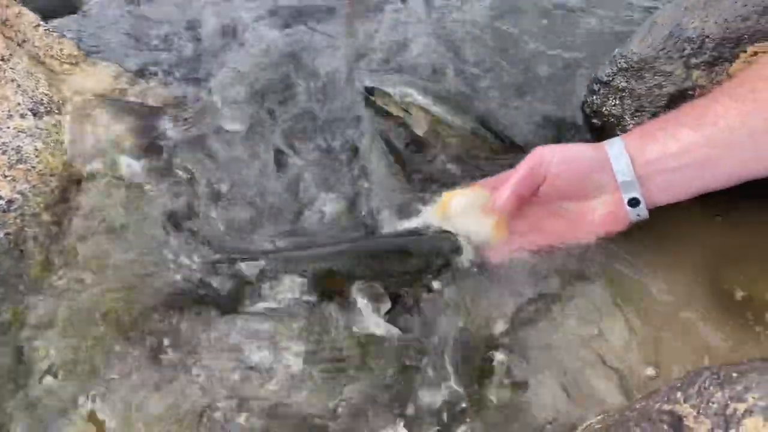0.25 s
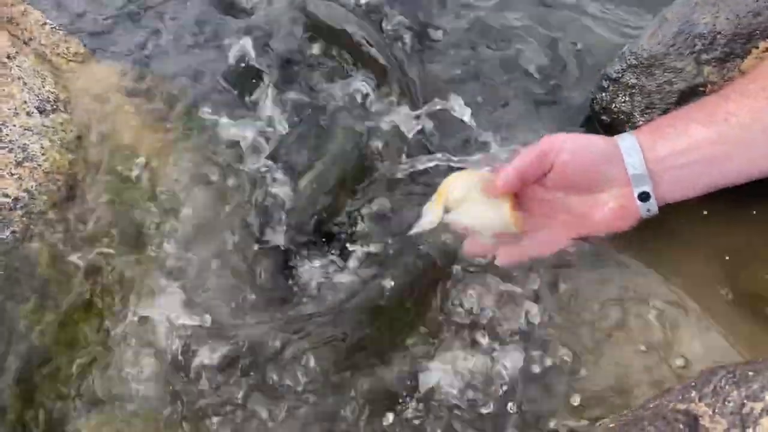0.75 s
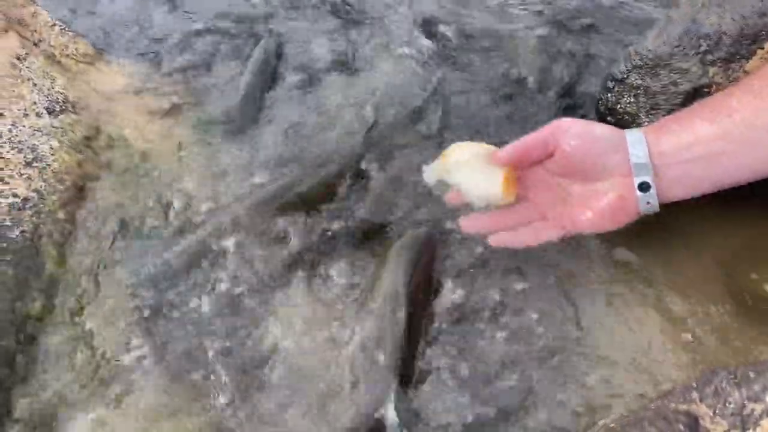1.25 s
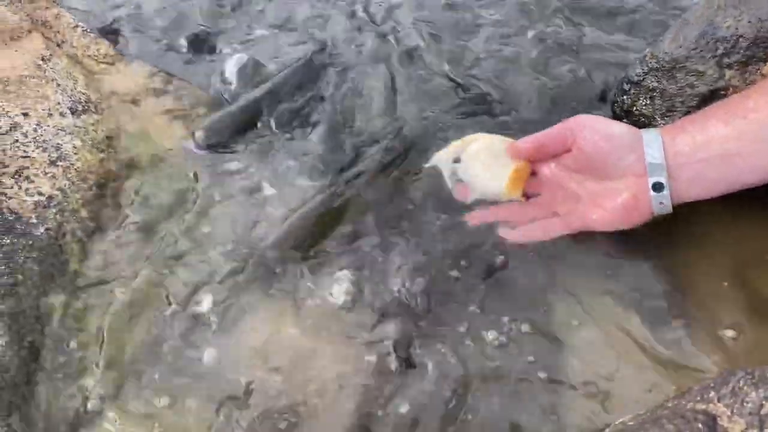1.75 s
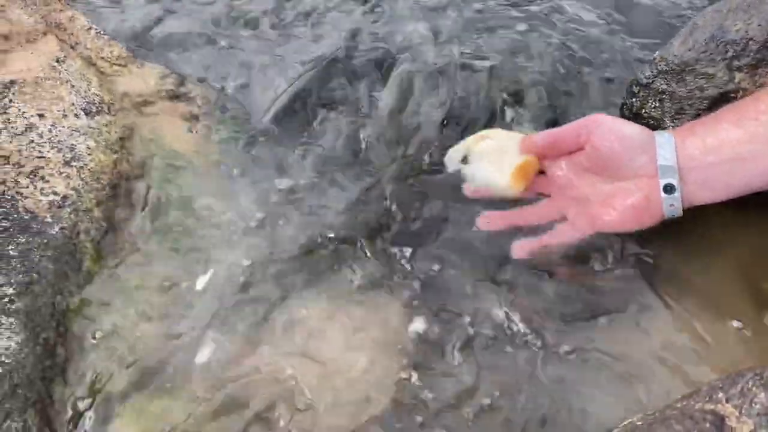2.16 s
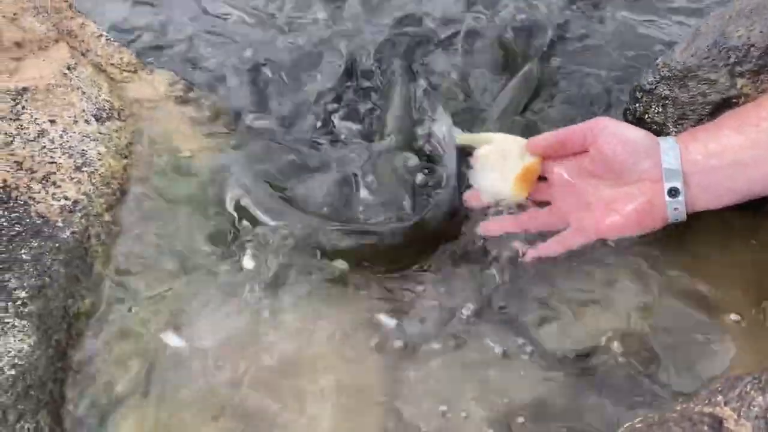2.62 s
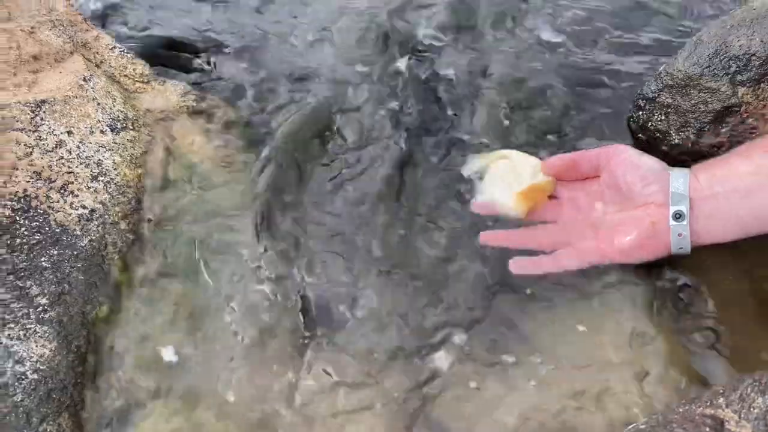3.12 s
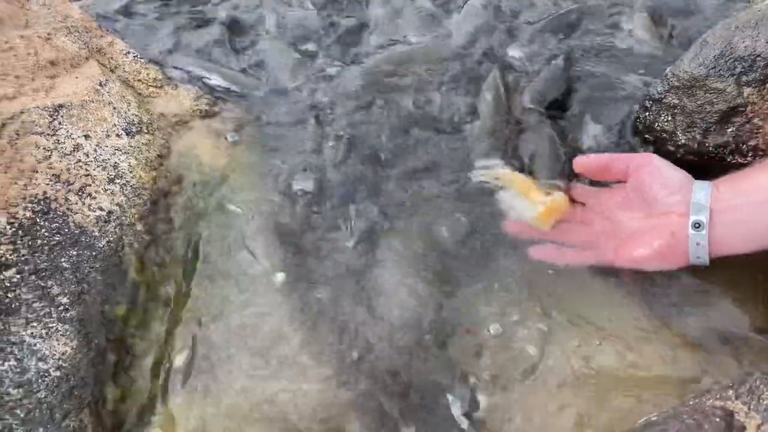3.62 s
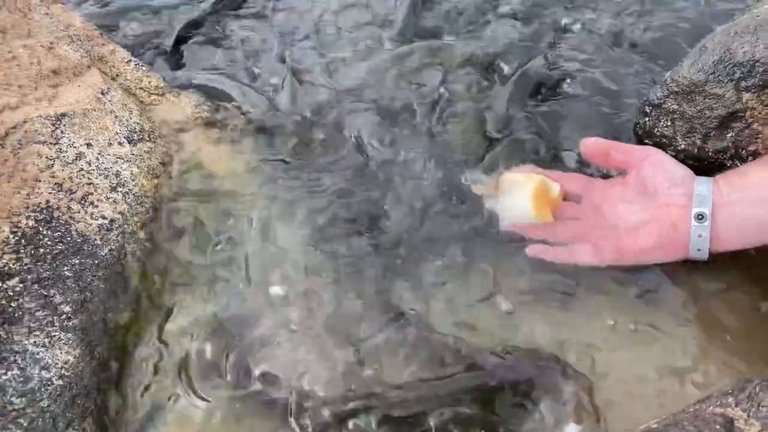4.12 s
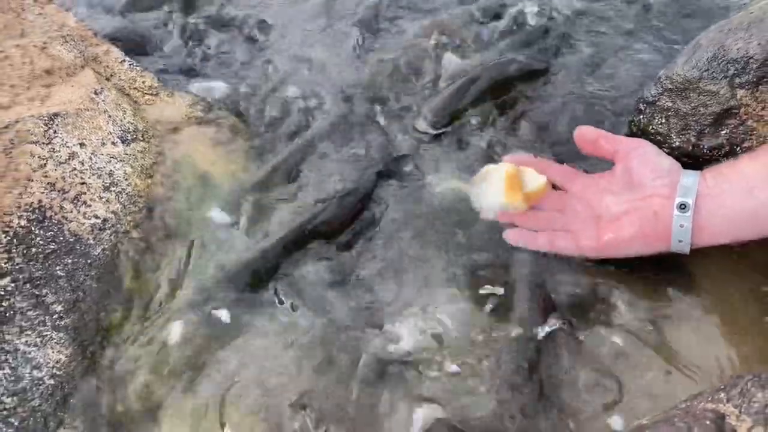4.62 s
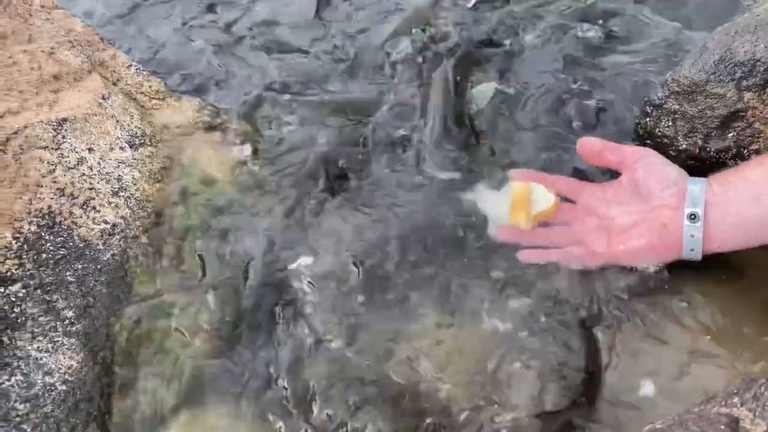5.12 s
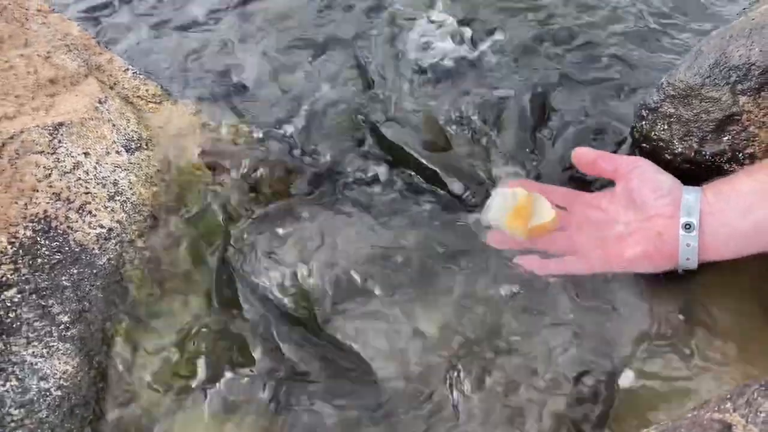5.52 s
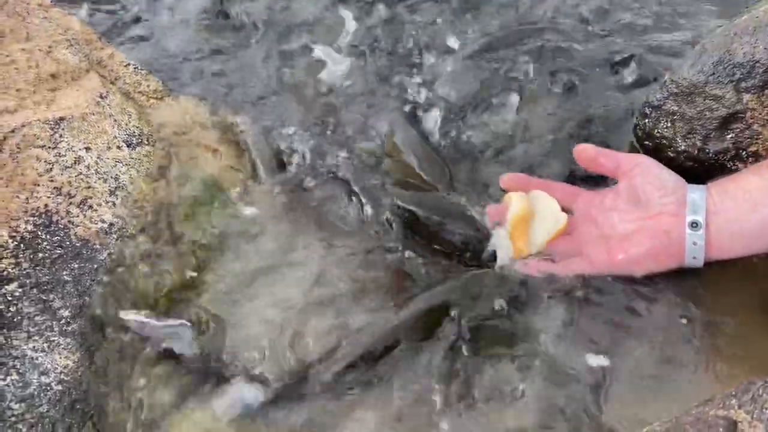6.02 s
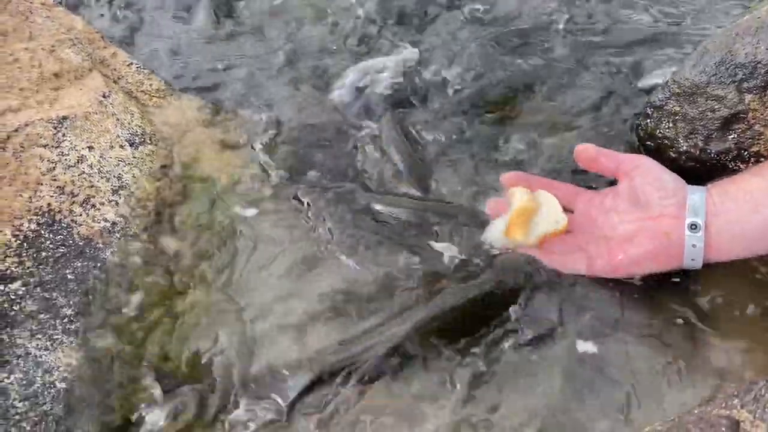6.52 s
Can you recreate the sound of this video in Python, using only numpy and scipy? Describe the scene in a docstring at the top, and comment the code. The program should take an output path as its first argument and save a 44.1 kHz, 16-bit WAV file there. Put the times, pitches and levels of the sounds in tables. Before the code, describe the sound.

Fish thrash at the surface of a shallow rocky pool, about an arm's length from the microphone. Splashes hiss up in the first second, ease into lapping with plinking bubbles and slapping drops, then swell again about three seconds in, with a smaller splash near the end. Gusty wind thumps, flutters and pops on the microphone throughout, heavier in the second half.

```python
"""Fish thrashing in a windy rock pool

Fish break the surface of a shallow pool, an arm's length from a pair of microphones. Spray hisses,
drops slap and click on the water, and bubbles ring between the rocks as short plinks. Gusty wind
thumps, pops and flutters on the microphones themselves. The sound stops short after six seconds."""
import sys
import numpy as np
from scipy import signal
from scipy.fft import rfft, irfft, next_fast_len
from scipy.io import wavfile
from scipy.ndimage import map_coordinates

SR = 44100
rng = np.random.default_rng(int(sys.argv[2]) if len(sys.argv) > 2 else 0)


def persist_wave(psi):
    """Save psi, clipped to +-1, as 16-bit WAV."""
    counts = np.round(np.clip(psi, -1, 1) * 32767).astype(np.int16)
    wavfile.write(sys.argv[1], SR, np.atleast_2d(counts).T)


N = 298361

# tone of the smallest eddies scuffing a microphone: f/Hz, level/dB
SCUFF_SPECTRUM = [(50, 1.5), (300, -12.5), (550, 3), (800, -0.5), (1200, -4.5), (2000, -19), (4000, -43.5)]
# midrange hiss of thrown water: f/Hz, level/dB
SPRAY_SPECTRUM = [(300, -19.5), (900, 3.5), (2000, -4.5), (4000, -7), (7000, -11), (10000, -20)]
# bright fizz on top of the spray: f/Hz, level/dB
FIZZ_SPECTRUM = [(3000, -11.5), (6500, -8.5), (10000, -7), (12700, -12), (15400, -5), (15900, -7),
                 (16500, -35.5)]


def amp(db):
    """Gain of a level in dB."""
    return 10 ** (np.asarray(db) / 20)


def unit(x):
    """x at rms 1."""
    return x / np.sqrt(np.mean(x ** 2) + 1e-20)


def eddy(rate):
    """A smooth random modulator, `rate` knots a second, its extremes rounded off."""
    knots = rng.standard_normal(int(N * 400 / SR))
    return 2 * np.tanh(map_coordinates(knots, [np.arange(N) * rate / SR]) / 2)


def filtered(x, response):
    """x through a filter given as a complex function of frequency."""
    size = next_fast_len(N + 8192)
    return irfft(rfft(x, size) * response(np.fft.rfftfreq(size, 1 / SR)), size)[..., :N]


def noise(spectrum):
    """Noise of rms 1, coloured by (f/Hz, level/dB) points on a log frequency axis."""
    f, db = np.transpose(spectrum)
    colour = lambda hz: amp(np.interp(np.log(hz + 1), np.log(f), db, left=-120, right=-120))
    return unit(filtered(rng.standard_normal(N), colour))


def wide_noise(spectrum, alike):
    """Noise from a wide stretch of water: only the share `alike` is common to both microphones."""
    angle = np.arccos(alike) / 2
    common, apart = noise(spectrum), noise(spectrum)
    return np.cos(angle) * common + np.sin(angle) * apart * [[1], [-1]]


def place(when, shapes):
    """Mixes one row of samples in at each start time."""
    at = np.round(when * SR).astype(int)[:, None] + np.arange(shapes.shape[1])
    return np.bincount(at.ravel(), shapes.ravel(), N + shapes.shape[1])[:N]


def rings(when, db, hz, cycles, rise):
    """Damped sines that swell to their peak in `cycles` periods; `rise` bends the pitch."""
    length = min(SR // 40, int(5 * SR * np.max(cycles / hz)))
    turns = hz[:, None] * np.arange(length) / SR
    age = turns / np.reshape(cycles, (-1, 1))
    bend = 1 + np.reshape(rise, (-1, 1)) * age
    envelope = amp(db)[:, None] * np.e * age * np.exp(-age)
    return place(when, envelope * np.sin(2 * np.pi * turns * bend))


def bursts(when, db, attack_s, decay_s):
    """An envelope with one short transient at each time."""
    t = np.arange(SR // 15) / SR
    return place(when, amp(db)[:, None] * (1 - np.exp(-t / attack_s)) * np.exp(-t / decay_s))


def gusts(thump_db, puffs):
    """Gain of bell-shaped swells: the strong gusts, plus small random puffs that follow the wind."""
    # the strongest gusts: t/s, flutter level/dB, half length/s
    strong_gusts = [(0.337, -23.5, 0.016), (0.398, -29.5, 0.021), (0.635, -24.5, 0.021),
                    (0.798, -23.5, 0.016), (0.91, -22.5, 0.0043), (1.023, -24, 0.022), (1.186, -24, 0.013),
                    (1.288, -26, 0.031), (1.423, -20.5, 0.013), (1.62, -23.5, 0.013), (1.73, -19, 0.0064),
                    (1.772, -21, 0.014), (2, -21.5, 0.016), (2.141, -21, 0.022), (2.281, -19.5, 0.004),
                    (2.455, -24, 0.01), (2.542, -24.5, 0.014), (2.76, -26, 0.023), (3.237, -16, 0.022),
                    (3.268, -16, 0.02), (3.325, -17, 0.0052), (3.542, -18.5, 0.035), (3.627, -17, 0.014),
                    (3.749, -20, 0.007), (3.813, -17.5, 0.0074), (3.933, -22, 0.067), (4.058, -18, 0.012),
                    (4.168, -18, 0.015), (4.242, -22, 0.0077), (4.286, -18, 0.0088), (4.367, -19, 0.0068),
                    (4.5, -25, 0.039), (4.677, -21.5, 0.015), (4.834, -19, 0.02), (4.88, -20, 0.021),
                    (4.945, -21.5, 0.02), (5.063, -23.5, 0.03), (5.47, -23, 0.048), (5.601, -17, 0.011),
                    (5.651, -22.5, 0.022), (5.69, -22, 0.014), (5.812, -21.5, 0.022), (5.928, -24, 0.028)]
    puff_at = rng.random(puffs) * (N - 1) / SR
    size, span = rng.standard_normal((2, puffs))
    puff_db = thump_db[(puff_at * SR).astype(int)] - 6 + 4.5 * size
    puff_half_s = .0082 * np.exp(.44 * span)
    when, db, half_s = np.hstack([np.transpose(strong_gusts), [puff_at, puff_db, puff_half_s]])
    t = np.arange(-SR // 10, SR // 10) / SR
    power = amp(2 * db)[:, None] * np.exp(-(t / half_s[:, None]) ** 2)
    return np.sqrt(np.roll(place(when, power), -SR // 10))


def glugs(count, centre_hz):
    """Short, rounded low rings within the flutter, each at its own pitch."""
    when = rng.random(count) * (N - 1) / SR
    pitch, size = rng.standard_normal((2, count))
    return unit(rings(when, 3 * size, centre_hz * 2 ** (.4 * pitch), cycles=1.3, rise=0))


def wind():
    """Large eddies thump and flutter on both microphones; the smallest scuff each one on its own."""
    # wind strength: t/s, thump level/dB, flutter between gusts over thump/dB, scuff over flutter/dB
    strength = [(0.0, -19, -15, 7.5), (0.08, -26, -15, -2.5), (0.67, -20.5, -16.5, -3),
                (1.08, -28, -25, -11), (1.5, -28, -11, -12.5), (2.09, -27.5, -9, -14),
                (2.47, -21.5, -4.5, -8.5), (3.06, -31.5, -10, -13), (3.21, -20.5, -12, -14.5),
                (3.41, -28, 4.5, -11.5), (3.53, -20.5, -4, -7.5), (4.3, -17.5, -10.5, -4),
                (4.5, -21, -22, -8.5), (5.09, -18, -7.5, -1), (5.17, -27.5, -7, -11), (5.68, -23.5, -6, -3),
                (5.97, -24.5, -10, -7), (6.04, -27, -20.5, 8)]
    # bass weight of the thump: f/Hz, level/dB
    thump_spectrum = [(15, -26.5), (25, -22), (49, -4), (75, 1), (400, -19.5), (520, -42), (880, -120)]
    # low-mid body of the flutter: f/Hz, level/dB
    flutter_spectrum = [(120, -0.5), (220, -2.5), (400, -4), (600, -9), (900, -36), (2000, -49)]
    when, *levels = np.transpose(strength)
    thump_db, lull_db, scuff_db = [np.interp(np.arange(N) / SR, when, db) for db in levels]
    swell = gusts(thump_db, puffs=45)
    thump_gain = np.hypot(amp(thump_db), amp(2) * swell)
    flutter_gain = np.hypot(amp(thump_db + lull_db), swell)
    buffeting = amp(2 * eddy(25))
    rumble = noise(thump_spectrum) + amp(-17) * noise(thump_spectrum) * [[1], [-1]]  # nearly mono
    thump = unit(buffeting * rumble)
    spikes = amp(4.83 * eddy(110))
    flapping = unit(spikes * noise(flutter_spectrum))
    flutter = unit(flapping + amp(-4) * glugs(count=700, centre_hz=340))
    scuff = np.array([unit(spikes * amp(3.1 * eddy(70)) * noise(SCUFF_SPECTRUM)) for _ in "LR"])
    return thump_gain * thump + flutter_gain * (flutter + amp(scuff_db) * scuff)


def splash_levels():
    """Spray level and fizz relative to it, in dB: steady lapping plus splashes that swell and die."""
    # fish breaking the surface: peak t/s, spray level/dB, fizz over spray/dB, 20 dB rise/s, 20 dB fall/s
    splashes = [(.33, -39.5, 0.5, 0.2, 0.86), (.61, -32.5, -3, 0.16, .5), (.72, -31.5, -3.5, 0.56, 0.25),
                (2.96, -42.5, -9, 0.4, 0.14), (3.32, -33, -18, 0.1, 0.6), (3.49, -28, -15, 0.29, 0.79),
                (3.88, -48, -9, 1, 0), (4.5, -45, -9, 1.5, 7), (5.33, -38.5, -8, 0.14, 3),
                (5.9, -46.5, -7.5, 2.5, 10)]
    lap_db, lap_fizz_db = -51, -5
    when, spray_db, fizz_db, rise_s, fall_s = np.transpose(splashes)[..., None]
    since = np.arange(N) / SR - when
    below_peak_db = 20 * np.where(since > 0, since / fall_s, -since / rise_s)
    power = amp(spray_db - below_peak_db) ** 2
    spray = amp(lap_db) ** 2 + power.sum(0)
    fizz = amp(lap_db + lap_fizz_db) ** 2 + (power * amp(fizz_db) ** 2).sum(0)
    return 10 * np.log10(spray), 10 * np.log10(fizz / spray)


def bubble_swarm(count, centre_hz, octaves, cycles, skew_s):
    """Small bubbles ring at random, each from its own direction; skew_s scatters the left-right delay."""
    when = .01 + rng.random(count) * (N / SR - .02)
    pitch, pan, span, glide = rng.standard_normal((4, count))
    db = 3 * np.minimum(rng.exponential(size=count), 5)
    hz = np.clip(centre_hz * 2 ** (octaves * pitch), 750, 9000)
    life = cycles * np.exp(.4 * np.minimum(span, 1))
    rise = .004 + .008 * glide
    channels = [rings(when + side * skew_s * pan, db + 5 * side * pan, hz, life, rise)
                for side in (.5, -.5)]
    return unit(np.array(channels))


def spatter(count, scatter_db):
    """An envelope of many tiny droplet impacts at random moments."""
    when = rng.random(count) * N / SR
    size = np.minimum(rng.exponential(size=count), 3.5)
    return bursts(when, scatter_db * size, attack_s=.0019, decay_s=.0011)


def churning_water():
    """The fish churn up patchy spray, swarms of bubbles and a spattering fizz."""
    spray_db, fizz_db = splash_levels()
    patches = amp(4 * eddy(23.004) + 2.3 * eddy(110))
    spray = amp(-1.5) * unit(patches * wide_noise(SPRAY_SPECTRUM, alike=.35))
    plinks = bubble_swarm(count=1200, centre_hz=2400, octaves=.7, cycles=2.3, skew_s=.00018)
    gurgle = bubble_swarm(count=5000, centre_hz=1700, octaves=.5, cycles=1, skew_s=.0002)
    # in a big splash single plinks sink into the wash and the dense gurgle comes forward
    plinks *= amp(-3 - .35 * (spray_db + 46.5))
    gurgle *= amp(.29 * (spray_db + 27))
    treble = wide_noise(FIZZ_SPECTRUM, alike=.85)
    ticks = amp(3) * unit(spatter(count=450, scatter_db=6))
    fizz = unit((unit(patches) + ticks) * treble)
    return amp(spray_db) * (spray + plinks + gurgle + amp(fizz_db) * fizz)


def clear_bubbles():
    """Single bubbles plink and plop, the pitch drifting up as each one moves."""
    # foreground bubbles: t/s, peak level/dB, f/Hz, life/cycles
    bubbles = [(0.15, -33, 3700, 4), (0.295, -14, 2040, 0.48), (0.401, -23.5, 1680, 5.1),
               (0.62, -23, 2140, 2.5), (0.637, -19, 1510, 3.5), (0.675, -18, 2540, 2.4),
               (1.016, -18.5, 1210, 4.7), (1.038, -9.5, 1097, 4.9), (1.275, -23, 2650, 1.1),
               (1.682, -23.5, 1600, 0.67), (1.691, -15, 1140, 0.71), (3.01, -28, 1490, 2.5),
               (3.441, -13.5, 3870, 2.4), (3.44, -10.5, 1860, 0.65), (4.279, -14, 1370, 1),
               (4.652, -15, 1300, 0.9), (5.965, -16.5, 6100, 2.1)]
    return rings(*np.transpose(bubbles), rise=.012)


def drops():
    """A drop strikes the water with a midrange slap and a shorter, brighter click."""
    # the loudest drops: t/s, slap level/dB, click level/dB
    impacts = [(0.227, -27, -50.5), (0.3313, -23.5, -27), (0.379, -26, -25), (0.4362, -26, -22.5),
               (0.543, -21.5, -45), (0.767, -20.5, -30.5), (0.8295, -32, -22), (0.97, -27, -27),
               (1.126, -29, -36), (2.34, -27, -31), (2.402, -40, -28.5), (2.773, -26.5, -36),
               (2.994, -26, -28), (3.26, -31.5, -33.5), (3.923, -26, -30), (4.174, -27.5, -52),
               (4.3536, -33, -31.5), (4.659, -26.5, -37.5), (4.689, -27, -34), (4.983, -20, -45),
               (5.0967, -30, -24), (5.2204, -25, -33), (5.286, -28.5, -25), (5.3318, -23.5, -24),
               (5.381, -45, -22), (5.9644, -24, -27.5), (6.0057, -20, -18)]
    when, slap_db, click_db = np.transpose(impacts)
    slap = bursts(when, slap_db, attack_s=.00022, decay_s=.0052) * wide_noise(SPRAY_SPECTRUM, alike=.045)
    click = bursts(when, click_db, attack_s=.0003, decay_s=.0013) * wide_noise(FIZZ_SPECTRUM, alike=.85)
    return slap + click


def wind_pops():
    """Wind pops: a short low pulse on both microphones and a crack of scuff on each."""
    # sudden hits of wind: t/s, pulse peak level/dB
    pops = [(0.335, -13), (0.501, -10.5), (0.538, -20), (0.996, -16.5), (2.137, -15), (2.188, -15.5),
            (2.229, -18), (2.28, -17), (2.524, -18.5), (2.688, -21.5), (2.874, -16.5), (3.219, -11.5),
            (3.804, -12), (3.878, -16), (3.901, -14.5), (4.039, -7.5), (4.124, -12.5), (4.155, -13.5),
            (4.237, -12.5), (4.282, -12), (4.651, -12), (4.807, -17.5), (4.836, -10.5), (4.888, -13.5),
            (5.042, -10), (5.058, -9), (5.584, -16), (5.64, -10.5), (5.786, -13), (5.908, -19)]
    when, db = np.transpose(pops)
    hz = 426 * 2 ** (.25 * rng.standard_normal(len(when)))
    pulse = rings(when, db, hz, cycles=.95, rise=-.041)
    scuff = np.array([noise(SCUFF_SPECTRUM) for _ in "LR"])
    return pulse + bursts(when, db - 6, attack_s=.001, decay_s=.0057) * scuff


def scene():
    """The water sits a little to the left; the wind acts on the microphones directly."""
    # lead of the left microphone for sound off the water: f/Hz, phase/rad
    left_lead = [(0, 0), (7600, 22.7), (16500, 8.4)]
    phase_pan = lambda hz: np.exp(.5j * np.interp(hz, *np.transpose(left_lead)) * [[1], [-1]])
    level_pan = amp([[.4], [-.4]])
    water = churning_water() + clear_bubbles() + drops()
    return filtered(water, phase_pan) * level_pan + wind() + wind_pops()


def record(dry):
    """Peaks are soft-clipped, the bass folds to mono, a fast fade ends it and the very top is cut."""
    # drifting edge below which both channels carry the same bass: t/s, f/Hz
    mono_edge = [(0, 30), (1.4, 130), (1.9, 340), (3.6, 450), (4.6, 220), (5.5, 460)]
    ceiling, top_hz = .95, 16527
    fade_start_s, fade_end_s = 6.03, 6.065
    left, right = dry / (1 + np.abs(dry / ceiling) ** 4) ** .25
    mid, side = (left + right) / 2, (left - right) / 2
    f, t, side_spectrum = signal.stft(side, SR, nperseg=2048)
    above_edge = f[:, None] > np.interp(t, *np.transpose(mono_edge))
    side = signal.istft(side_spectrum * above_edge, SR, nperseg=2048)[1][:N]
    fade = np.clip((fade_end_s - np.arange(N) / SR) / (fade_end_s - fade_start_s), 0, 1)
    return filtered(np.array([mid + side, mid - side]) * fade, lambda hz: hz < top_hz)


dry = scene()
out = record(dry)
persist_wave(out)
```